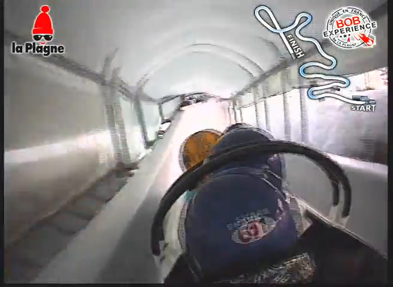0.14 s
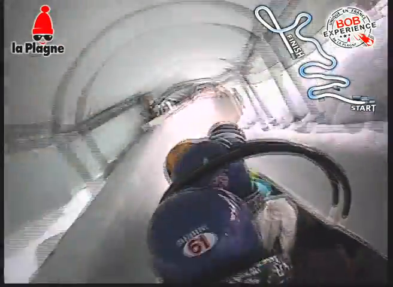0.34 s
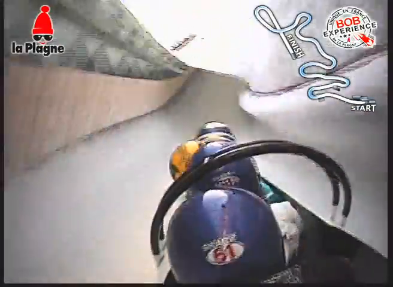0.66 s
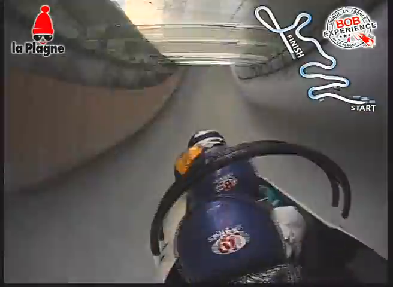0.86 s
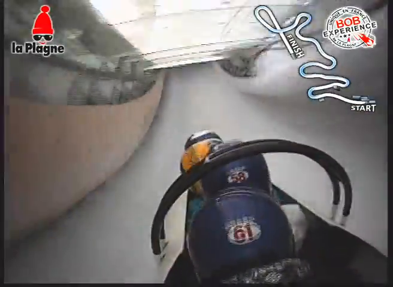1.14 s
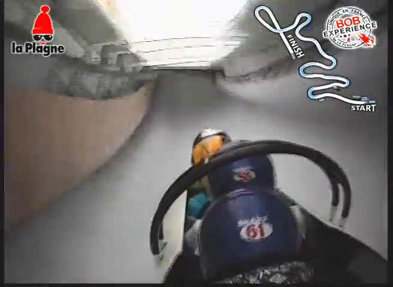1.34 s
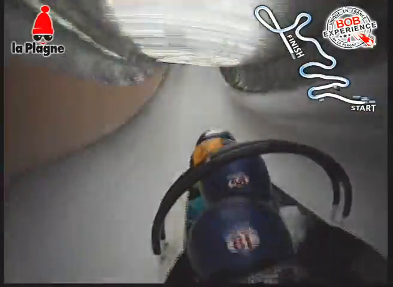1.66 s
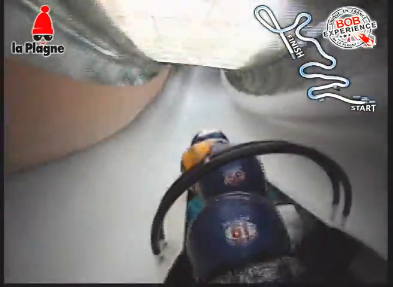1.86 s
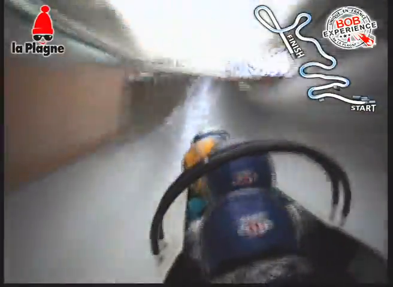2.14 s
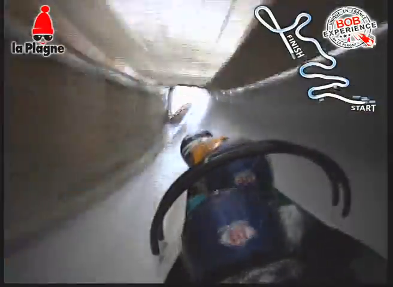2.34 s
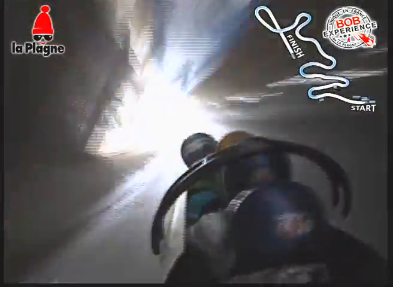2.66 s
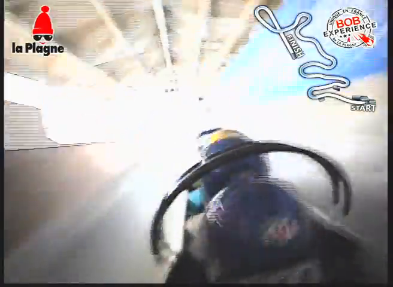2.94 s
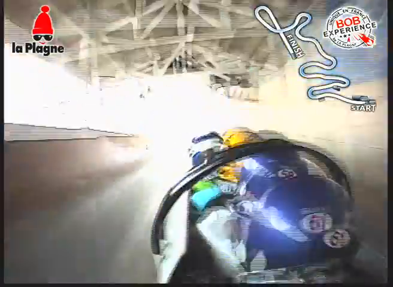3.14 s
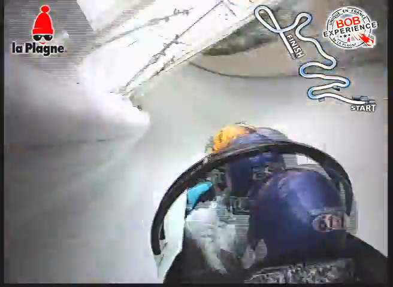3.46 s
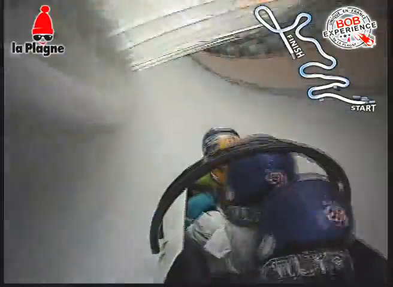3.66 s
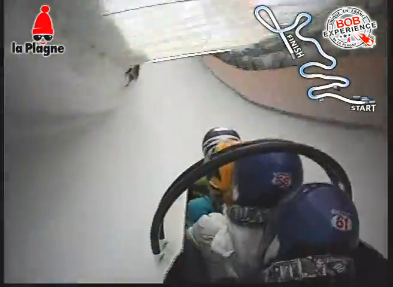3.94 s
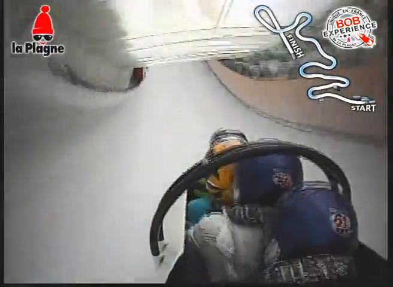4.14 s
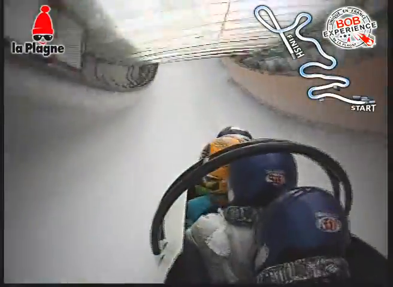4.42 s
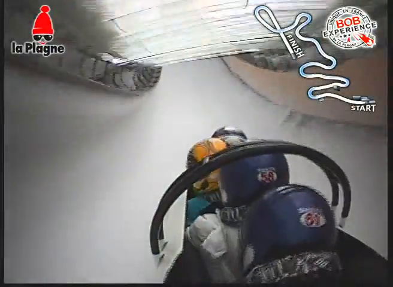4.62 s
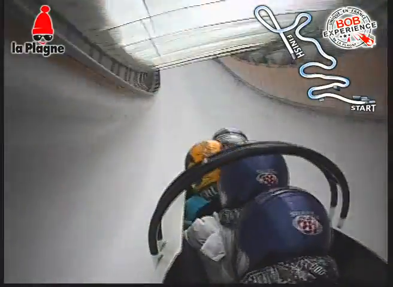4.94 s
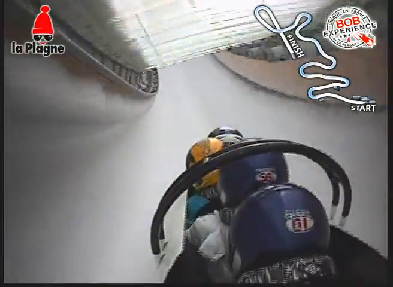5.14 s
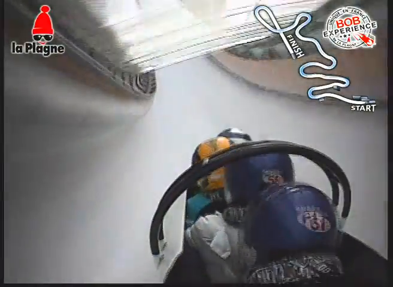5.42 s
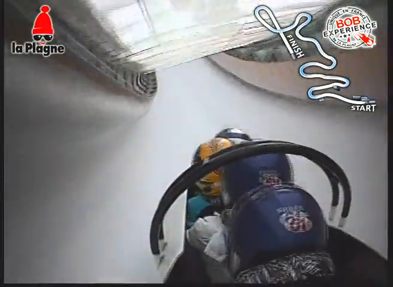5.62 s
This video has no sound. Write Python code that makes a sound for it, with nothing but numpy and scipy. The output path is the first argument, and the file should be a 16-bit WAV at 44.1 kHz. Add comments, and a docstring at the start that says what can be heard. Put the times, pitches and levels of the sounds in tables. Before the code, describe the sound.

A bobsled speeds down an ice track with low hull rumble, chattering runners, panel knocks, metallic rattles and buffeting wind, heard only on the left.

```python
"""A bobsleigh races down an ice track, heard by a microphone fixed to the sled and wired to the left input only.
Random bumps and grit in the ice ring the shell of the hull and make the runners chatter.
A loose panel gives ringing knocks, and metal fittings tick, rattle and crackle as short scrapes of noise.
Wind buffets the microphone as low, lumpy noise.
The unused right input carries only hiss and a faint electrical whine, which the left input has too."""
import sys
import numpy as np
from scipy import signal
from scipy.io import wavfile

SR = 44100
rng = np.random.default_rng(int(sys.argv[2]) if len(sys.argv) > 2 else 0)


def undo_db(level):
    """Turn decibels back into plain size, where 20 dB means ten times bigger."""
    steps = np.asarray(level, float) / 20
    return 10 ** steps


def master(y):
    """Save y as 16-bit WAV."""
    cut = np.clip(np.atleast_2d(y).T, -1, 1)
    pcm = np.round(cut * 32767)  # scale
    wavfile.write(sys.argv[1], SR, pcm.astype(np.int16))


N = 255339  # length of the scene in samples

# spectrum of a hard scraping contact: (frequency [Hz], level [dB per Hz])
CRACK_SPECTRUM = [(500, 0), (1100, 4), (1900, -0.5), (2800, -13.5), (4500, -21), (14000, -76)]
# resonances of the metal fittings: (frequency [Hz], width [Hz], level [dB])
FITTING_MODES = [(2540, 1040, -1), (3960, 890, 2), (5200, 220, -14)]


def evened(x):
    """Scales a sound to an average strength (rms) of 1."""
    return x / np.sqrt(np.mean(x ** 2) + 1e-20)


def colour(x, points):
    """Filters a sound to follow a drawn spectrum, without any echo ahead of the sound."""
    hz, db = np.transpose(points)
    grid_hz = np.fft.rfftfreq(8192, 1 / SR)
    half = np.interp(np.log(grid_hz + 1), np.log(hz + 1), db, -90, -90)  # -90 dB outside the drawn points
    log_gain = np.log(undo_db(np.r_[half, half[-2:0:-1]]))
    # the Hilbert transform gives the phase that puts the response as early as possible
    taps = np.fft.ifft(np.exp(np.conj(signal.hilbert(log_gain)))).real[:4096]
    return signal.oaconvolve(x, taps)[:len(x)]


def resonate(x, modes):
    """Sum of two-pole resonances, each of gain 1 at its centre before its dB."""
    return sum(undo_db(db) * signal.lfilter(*signal.iirpeak(hz, hz / width, SR), x) for hz, width, db in modes)


def lumps(hz, depth_db):
    """Random gain that wanders at up to about hz."""
    wander = signal.lfilter(*signal.butter(2, hz, fs=SR), rng.standard_normal(N))
    return undo_db(depth_db * evened(wander))


def grains(per_s, spread_db):
    """Random clicks of either sign and uneven size."""
    size = undo_db(spread_db * np.minimum(rng.exponential(1, N), 3)) * rng.choice([-1, 1], N)
    return size * (rng.random(N) < per_s / SR)


def swells(rows, length_s):
    """Decibels added by events, each a smooth bell-shaped swell, or a dip where negative."""
    t = np.arange(0, N / SR + .002, .001)  # a coarse clock of 1 ms is enough
    s, db = np.transpose(rows)[:, :, None]
    bells = db * np.exp(-((t - s) / length_s) ** 2)
    return np.interp(np.arange(N) / SR, t, bells.sum(0))


def follow(base_db, of_load, of_bumpiness, own_db=0):
    """Gain of a layer: its level at the resting load, its shares of load and bumpiness, and its own events."""
    # how hard the runners press on the ice: (time [s], level [dB])
    load = [(0.0, -22.5), (0.22, -19), (0.35, -23), (1.18, -26.5), (1.58, -23), (1.9, -17.5), (2.39, -20),
            (2.74, -22), (3.18, -21.5), (3.4, -22.5), (3.76, -24.5), (4.34, -20), (4.69, -21),
            (5.01, -24.5), (5.31, -22.5), (5.79, -25.5)]
    # bumpy and smoother moments of the ice: (time [s], change against the load, negative is quieter [dB])
    bumpiness = [(0.1, -1), (0.19, -2), (0.26, 4), (0.4, -1.5), (0.485, 2.5), (0.66, 6.5), (0.82, 1),
                 (0.95, 1), (1.1, 5), (1.37, 4.5), (1.64, 7.5), (1.92, 2.5), (2.06, -1.5), (2.16, -2),
                 (2.27, -2.5), (2.43, 5.5), (2.64, 1.5), (2.96, 8.5), (3.16, 5), (3.44, 6.5), (3.68, 2.5),
                 (3.98, 5.5), (4.17, 5.5), (4.37, 2.5), (4.7, 3), (4.85, 9.5), (5.09, 3.5), (5.24, 6),
                 (5.33, 6.5), (5.48, 4), (5.69, 7), (5.78, 4.5)]
    rest_db = -25
    load_db = np.interp(np.arange(N) / SR, *np.transpose(load)) - rest_db
    bumpy_db = swells(bumpiness, length_s=0.036)
    return undo_db(base_db + of_load * load_db + of_bumpiness * bumpy_db + own_db)


def wind():
    """Moving air presses unevenly on the microphone: low, lumpy noise with gusts and slight lulls."""
    # spectrum of the wind: (frequency [Hz], level [dB per Hz])
    wind_spectrum = [(12, -8), (25, -7), (50, -2.5), (90, -3), (130, -2), (300, -26.5), (1000, -67)]
    # gusts and slight lulls: (time [s], change against the steady wind, negative is quieter [dB])
    gusts = [(0.07, 0), (0.14, 2.5), (0.4, 2), (0.49, 4), (0.66, 3), (1.84, -0.5), (2.29, 6), (2.43, 6.5),
             (2.63, 0), (2.93, 4), (3.05, 7), (3.16, 9), (3.3, 3), (3.43, 5), (3.95, 5), (4.24, 2),
             (4.44, 5), (4.61, 5.5), (4.83, 6.5), (5.21, 4.5), (5.46, 11.5)]
    pressure = colour(rng.standard_normal(N), wind_spectrum) * lumps(hz=3.4, depth_db=0.5)
    gust_db = swells(gusts, length_s=0.049)
    return follow(base_db=-31, of_load=0.9, of_bumpiness=0.26, own_db=gust_db) * evened(pressure)


def crackle():
    """The many light touches of panel and fittings: short dull scrapes at random."""
    t = np.arange(600) / SR
    burst = t * np.exp(-t / 0.0016)
    touches = signal.oaconvolve(abs(grains(per_s=57, spread_db=4)), burst)[:N]
    scrapes = rng.standard_normal(N) * touches
    contact = colour(scrapes, CRACK_SPECTRUM) + undo_db(-21.5) * resonate(scrapes, FITTING_MODES)
    return follow(base_db=-54, of_load=1, of_bumpiness=0.86) * evened(contact)


def rattle(judder):
    """Countless small dry ticks, clumped by the judder, over a thin ice spray; larger ticks are brighter."""
    # spectrum of the rattle: (frequency [Hz], level [dB per Hz])
    rattle_spectrum = [(1200, -46), (2600, -1), (4200, 0.5), (5800, -6.5), (9500, -11.5), (13000, -16)]
    # moments when the loose fittings rattle more or fall quiet: (time [s], change against their murmur [dB])
    shakes = [(0.04, 13), (0.26, 11.5), (0.34, 6), (0.41, 11), (0.67, 1), (0.8, -19), (0.99, 9), (1.1, 4),
              (1.37, 7.5), (1.48, -3), (1.67, 4), (1.79, 5.5), (2.02, 3), (2.29, 2), (2.41, 0), (2.6, 6),
              (2.73, 7.5), (2.85, -1), (2.98, -1), (3.16, 17.5), (3.29, 12), (3.39, 0), (3.53, 6.5),
              (3.66, 7), (3.97, 3), (4.18, 1.5), (4.39, 8.5), (4.63, 5), (4.85, 8), (5.1, 5), (5.3, 2.5),
              (5.48, 13)]
    spray, split_hz = 0.15, 5200
    t = np.arange(400) / SR
    burst = t * np.exp(-t / 0.00096)
    size = abs(grains(per_s=220, spread_db=1.0))
    # squaring the sizes for the treble leaves the small ticks dull
    shake = spray + evened(signal.oaconvolve(np.array([size, size ** 2]), burst[None], axes=1)[:, :N])
    dull, bright = rng.standard_normal((2, N)) * [evened(row) for row in shake]
    scrape = signal.lfilter(*signal.butter(2, split_hz, fs=SR), dull)
    scrape += signal.lfilter(*signal.butter(2, split_hz, "high", fs=SR), bright)
    clumped = scrape * judder ** 0.19 * lumps(hz=15, depth_db=2)
    shake_db = swells(shakes, length_s=0.038)
    law = follow(base_db=-66, of_load=1, of_bumpiness=0.82, own_db=shake_db)
    return law * evened(colour(clumped, rattle_spectrum))


def ticks():
    """A fitting slips for a few ms: noise rings its metal, adds a bright snap, and a hard tick strikes its seat."""
    # ticks of metal fittings: (time [s], level [dB], brightness [dB])
    tick_rows = [(0.044, -42, 3), (0.059, -37.5, 2), (0.197, -30, -13), (0.2014, -26, -17),
                 (0.223, -25, -3), (0.2337, -18, -29), (0.24, -23, -5), (0.247, -15, -15),
                 (0.254, -20, -13), (0.261, -17, -29), (0.2683, -9.5, -26), (0.3007, -31, -24),
                 (0.3058, -21.5, -30), (0.331, -26.5, -20), (0.38, -41, -30), (0.404, -31, -22),
                 (0.4614, -53, 0), (0.472, -42, -3), (0.4856, -22, -12.5), (0.571, -38, -0.5),
                 (0.61, -45, 4), (0.6482, -42, 6.5), (0.7976, -40.5, 0.5), (0.838, -38, -30),
                 (0.9378, -39, -20), (0.965, -37.5, 0.5), (0.9882, -32, -22), (1.0715, -39, -25),
                 (1.0909, -34, -25), (1.1877, -40, -25), (1.3498, -27, -35), (1.476, -34, -25),
                 (1.5217, -29.5, -33), (1.559, -34.5, -40), (1.6222, -28, -26), (1.656, -20.5, -27),
                 (1.678, -36, -3), (1.737, -28, -25), (1.7659, -34, -30), (1.8704, -18, -23),
                 (1.915, -20, -34), (1.9827, -18.5, -29), (2.023, -26, -28), (2.048, -23.5, -35),
                 (2.064, -29, -31), (2.163, -25.5, -30), (2.074, -34, -35), (2.178, -26.5, -27),
                 (2.225, -45, -30), (2.263, -30, -28), (2.277, -28, -30), (2.2987, -33, -31),
                 (2.3321, -44, -27), (2.3875, -31, -20), (2.4142, -26.5, -8), (2.421, -22, -26),
                 (2.4434, -43, 1), (2.4508, -40, -35), (2.4806, -32, -32), (2.527, -31, -24),
                 (2.581, -35, -25), (2.606, -29, -32), (2.661, -29.5, -24), (2.83, -21.5, -17),
                 (2.9362, -39, -27), (3.1062, -23, -33), (3.1292, -20, -6), (3.1382, -22, -24),
                 (3.1596, -30, -2), (3.178, -26, -15), (3.2197, -35, -4), (3.355, -30.5, -14),
                 (3.3722, -32, -14), (3.433, -23, -19), (3.4437, -30, -23), (3.5648, -32, -31),
                 (3.633, -26.5, -24), (3.662, -39, 1.5), (3.6815, -28.5, -26), (3.8698, -28.5, -29),
                 (3.905, -33, -25), (3.9485, -25, -21), (4.0027, -19.5, -36), (4.0941, -37, -24),
                 (4.125, -19.5, -27), (4.156, -23, -33), (4.2258, -23, -34), (4.3056, -45, -29),
                 (4.381, -35, 7.5), (4.4214, -26.5, -3.5), (4.441, -24, -30), (4.6224, -24.5, -27),
                 (4.66, -25.5, -25), (4.7017, -22, -24), (4.738, -24.5, -33), (4.7684, -29, -32),
                 (4.842, -15.5, -35), (4.855, -26, -15), (4.895, -24.5, -33), (4.9275, -26.5, -28),
                 (5.1408, -28, -32), (5.2295, -37, -25), (5.3308, -21.5, -36), (5.384, -26, -38),
                 (5.472, -17, -28), (5.665, -20.5, -42), (5.7014, -28, -34), (5.768, -31, -34)]
    # mode of the fitting's seat, woken by hard ticks: (frequency [Hz], width [Hz], level [dB])
    seat_modes = [(2900, 1500, 6)]
    dull, bright, hard = np.zeros((3, N + 800))
    ms = np.arange(800) / SR * 1000
    shape = (1 - np.exp(-(ms / 0.68) ** 1.9)) * np.exp(-(ms / 1.46) ** 0.85)
    scrapes = np.tanh(rng.standard_normal((len(tick_rows), 2, 800))) * shape  # tightly packed slips of like size
    # every scrape gets the same energy before its own level
    scrapes *= .63 * np.linalg.norm(shape) / np.linalg.norm(scrapes, axis=2, keepdims=True)
    for (s, db, bright_db), (low_scrape, high_scrape) in zip(tick_rows, scrapes):
        start = round(s * SR)
        dull[start:][:800] += undo_db(db) * low_scrape
        bright[start:][:800] += undo_db(db + bright_db) * high_scrape
        # one clean blow as it seats; grows faster than the scrape
        hard[round((s + .001) * SR)] += undo_db(2.0 * db)
    ringing = undo_db(5.5) * resonate(dull, FITTING_MODES)
    snap = undo_db(14.0) * signal.lfilter(*signal.butter(2, 6000, "high", fs=SR), bright)
    thwack = undo_db(23.0) * resonate(hard, seat_modes)
    return (ringing + snap + thwack)[:N]


def knocks():
    """Each blow rings the loose panel; harder contact adds a crack and wakes the upper mode."""
    # knocks: (time [s], level [dB], hardness: crack and upper mode against the low ring [dB])
    knock_rows = [(0.068, -23, -11.5), (0.115, -11, -19.5), (0.152, -24, -11), (0.186, -6.5, -25.5),
                  (0.224, -30, 2.5), (0.268, -18.5, -5), (0.402, -33.5, 1.5), (0.486, -13.5, -22),
                  (0.838, -16.5, -27), (0.879, -32.5, -15), (0.975, -31.5, -7), (0.988, -29, -8),
                  (1.093, -27.5, -9.5), (1.107, -30, -12), (1.343, -16.5, -17.5), (1.385, -17, -22),
                  (1.861, -9.5, -22), (1.903, -8, -19), (1.982, -13, -23), (1.998, -13, -20),
                  (2.067, -11.5, -19.5), (2.165, -15.5, -20), (2.21, -15.5, -16.5), (2.314, -25, -9),
                  (2.35, -27.5, -9), (2.403, -14.5, -17.5), (2.675, -11, -21.5), (2.727, -12.5, -23.5),
                  (2.83, -17, -16), (2.847, -13, -18.5), (2.949, -17, -18), (2.979, -8, -21.5),
                  (3.161, -17, -10), (3.278, -27, -14), (3.323, -34, -7), (3.378, -19, -20),
                  (3.428, -10.5, -25), (3.405, -40, -12), (3.4629, -23, -7.5), (3.61, -27, -9.5),
                  (3.696, -18.5, -18), (3.842, -26, -13), (3.95, -34, 1.5), (4.077, -29.5, -4.5),
                  (4.124, -21, -12), (4.151, -10, -30), (4.177, -6, -28), (4.219, -30.5, -1),
                  (4.258, -25, -8.5), (4.344, -18, -16.5), (4.411, -13, -18), (4.438, -23.5, -6.5),
                  (4.622, -15.5, -16), (4.659, -21.5, -11.5), (4.696, -12, -16), (4.796, -10, -21.5),
                  (4.843, -11, -12.5), (4.897, -21.5, -8), (4.945, -10, -22.5), (5.001, -16, -19),
                  (5.086, -30, -6), (5.102, -8.5, -20.5), (5.133, -32, 1), (5.178, -30.5, -9),
                  (5.231, -12, -19), (5.269, -29.5, -2.5), (5.304, -13, -16), (5.33, -27, -1.5),
                  (5.47, -20, -7.5), (5.485, -13, -22), (5.527, -12.5, -19.5), (5.568, -17, -16),
                  (5.633, -19.5, -16), (5.665, -18, -8.5), (5.68, -8.5, -27), (5.703, -28, -20),
                  (5.721, -12.5, -19.5), (5.768, -12, -21.5)]
    # modes of the panel: (middle frequency [Hz], level [dB], time to fall 60 dB [s], rise time [s])
    panel_modes = [(858.6, -3, 0.028, 0.002), (1836, 0, 0.021, 0.00071)]
    ring, crack = np.zeros((2, N + 3000))
    t = np.arange(3000) / SR
    turns = rng.random((len(knock_rows), len(panel_modes)))
    noise = rng.standard_normal((len(knock_rows), 3000))
    crack_rise = 1 - np.exp(-(t / 0.0012) ** 2)
    for (s, db, hard_db), turn, scrape in zip(knock_rows, turns, noise):
        start = round(s * SR)
        crack[start:][:3000] += undo_db(db + hard_db - 60 * t / 0.026) * crack_rise * np.tanh(scrape)
        for k, (hz, mode_db, t60, rise_s) in enumerate(panel_modes):
            knock_hz = hz * (1 + 0.13 * (turn[1 - k] - .5))  # the pitch differs a little from blow to blow
            mode = np.sin(2 * np.pi * (knock_hz * t + turn[k])) * (1 - np.exp(-(t / rise_s) ** 2))
            ring[start:][:3000] += undo_db(db + mode_db + hard_db * (k > 0) - 60 * t / t60) * mode
    return (undo_db(0.5) * ring + undo_db(20.5) * colour(crack, CRACK_SPECTRUM))[:N]


def chatter(bumps, judder):
    """The runners skip over the ice: the bumps plus finer grit, in bursts."""
    # spectrum of the chatter: (frequency [Hz], level [dB per Hz])
    chatter_spectrum = [(300, 1), (520, -6), (620, -3), (870, -1), (1100, -8.5), (1400, -16.5), (1850, -20),
                        (2200, -40), (3000, -49), (6000, -42.5), (14000, -54)]
    grit = evened(grains(per_s=1200, spread_db=2.0))
    skips = (0.1 * evened(bumps) + grit) * judder
    return follow(base_db=-41, of_load=1.2, of_bumpiness=1.15) * evened(colour(skips, chatter_spectrum))


def flex():
    """The steady drag of the runners drives the shell's lowest mode, which swells and shifts as the ride bends it."""
    # path of the lowest mode: (time [s], level before the overall loss [dB], frequency [Hz])
    flex_path = [(0.0, -36, 142), (0.06, -20, 146), (0.16, -40, 141), (0.19, -16.5, 158), (0.31, -27, 138),
                 (0.63, -34.5, 150), (0.64, -12.5, 146), (0.71, -27.5, 150), (1.23, -26, 146),
                 (1.34, -23, 144), (2.1, -21, 148.4), (2.84, -30.5, 152), (3.18, -20.5, 136),
                 (3.21, -30, 132), (3.27, -29, 152), (3.84, -23, 168.5), (3.95, -18, 153), (4.11, -28, 153),
                 (4.14, -21, 138), (4.82, -20.5, 150), (4.92, -22, 159), (5.0, -25.5, 145),
                 (5.48, -20, 161), (5.51, -43, 160), (5.68, -18.5, 138), (5.74, -29, 150),
                 (5.79, -16.5, 170)]
    width_hz, loss_db = 73, 1.5
    s, db, hz = np.transpose(flex_path)
    t = np.arange(N) / SR
    turn = np.exp(2j * np.pi * np.cumsum(np.interp(t, s, hz)) / SR)
    r = np.exp(-np.pi * width_hz / SR)
    # smooth noise at zero frequency, then spin it up to wherever the mode sits
    slow = signal.lfilter([1], np.convolve([1, -r], [1, -r]), rng.standard_normal(N) / turn)
    return undo_db(np.interp(t, s, db) - loss_db) * evened((slow * turn).real)


def hull(bumps):
    """Bumps in the ice shake the upper modes of the shell."""
    # upper modes of the shell: (frequency [Hz], width [Hz], level [dB])
    shell_modes = [(203.5, 44, -2.5), (288, 68, -8), (368.5, 84, -8)]
    softened = resonate(bumps, [(229, 288, 0)])  # one broad resonance ahead of the narrow ones
    return follow(base_db=-30, of_load=0.98, of_bumpiness=0.88) * evened(resonate(softened, shell_modes))


def scene():
    """Everything reaches the one microphone; nothing reaches the other input."""
    bumps = grains(per_s=700, spread_db=-1.0) * lumps(hz=29.0, depth_db=2.0)
    judder = lumps(hz=30.4, depth_db=2.5) * lumps(hz=86, depth_db=2.0)
    sled = wind() + crackle() + rattle(judder) + ticks() + knocks()
    sled += chatter(bumps, judder) + flex() + hull(bumps)
    return np.array([sled, np.zeros(N)])


def whine_partials():
    """The electrical whine as eight equal steady tones, at multiples of 1500 Hz."""
    turns = 1500 * np.outer(np.arange(1, 9), np.arange(N) / SR)
    return np.sqrt(2) * np.cos(2 * np.pi * turns)


def preamp(dry):
    """Boosts the microphone and adds hiss and whine; the upper whine tones also modulate the sound."""
    gain_db, whine_db, hiss_db, whine_on_sound_db = 6, -87, -76, -53
    partials = whine_partials()
    loud = undo_db(gain_db) * dry * (1 + undo_db(whine_on_sound_db) * partials[5:].sum(0))
    loud -= undo_db(whine_db) * partials.sum(0)
    return loud + undo_db(hiss_db) * rng.standard_normal((2, N))


def overload(loud):
    """Squeezes the loudest peaks smoothly towards a ceiling of 1.1."""
    return loud / (1 + abs(loud / 1.1) ** 5) ** (1 / 5)


def low_pass(x):
    """Removes everything above the highest recorded frequency."""
    return signal.sosfilt(signal.butter(12, 13800, fs=SR, output="sos"), x)


def record(dry):
    """Preamp, soft overload and a limit on the treble at 12.5 kHz."""
    squeezed = overload(preamp(dry))
    edge = signal.firwin(121, 12500, window=("kaiser", 8), fs=SR)
    mix = signal.oaconvolve(squeezed, edge[None], "same", axes=1)
    return low_pass(mix)


dry = scene()
out = record(dry)
master(out)
```